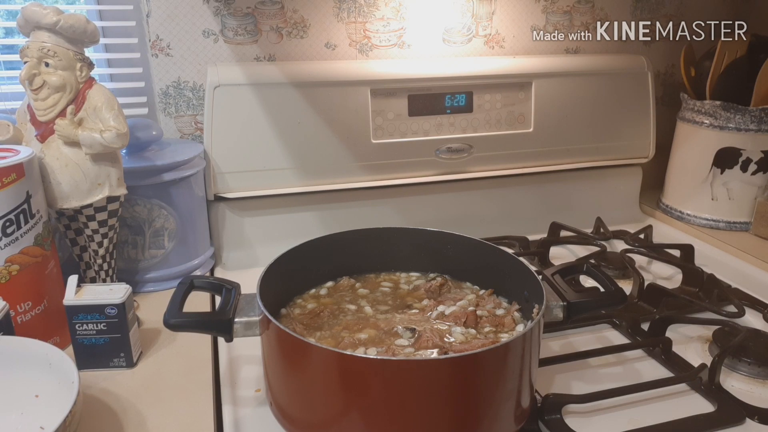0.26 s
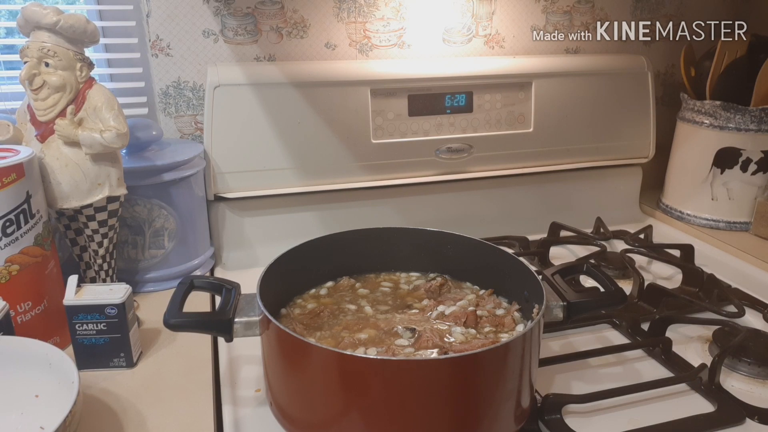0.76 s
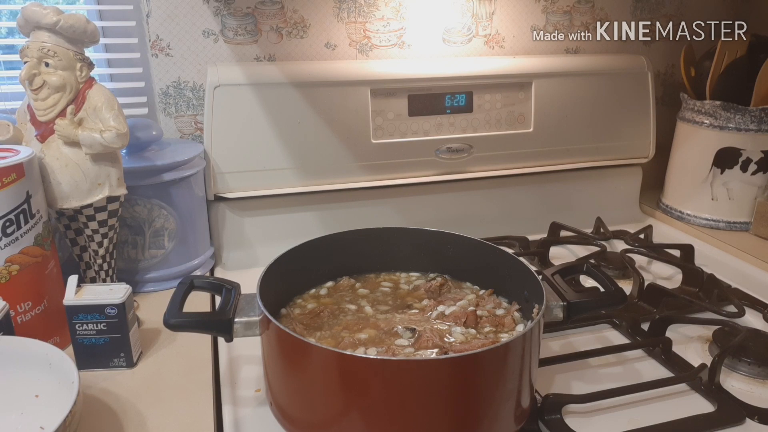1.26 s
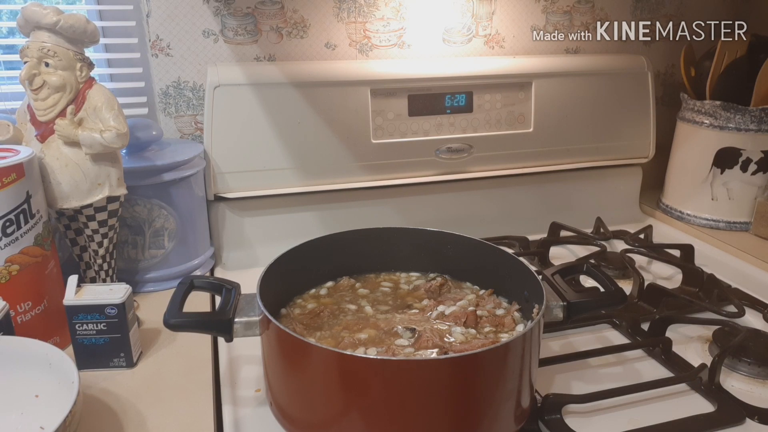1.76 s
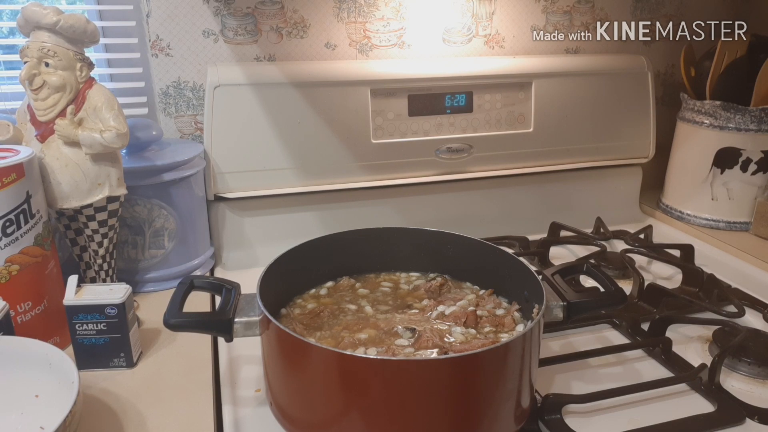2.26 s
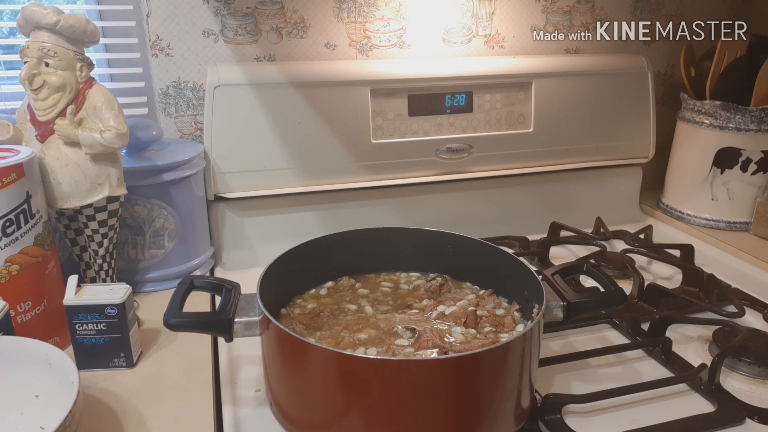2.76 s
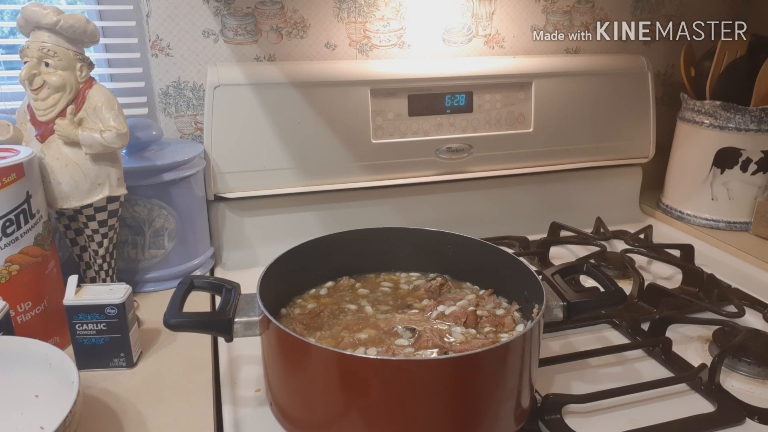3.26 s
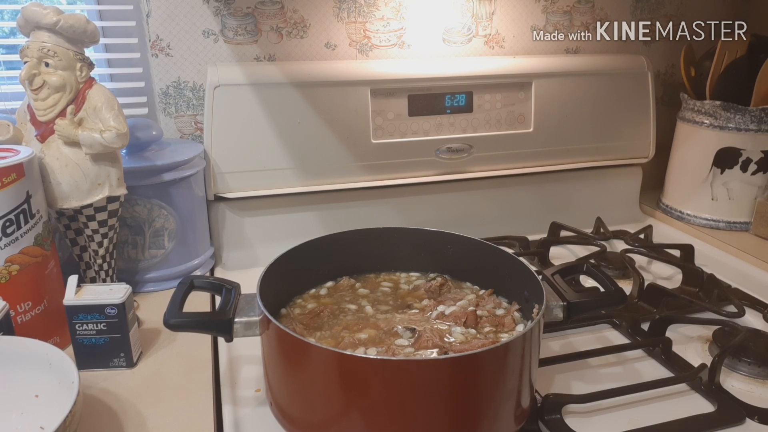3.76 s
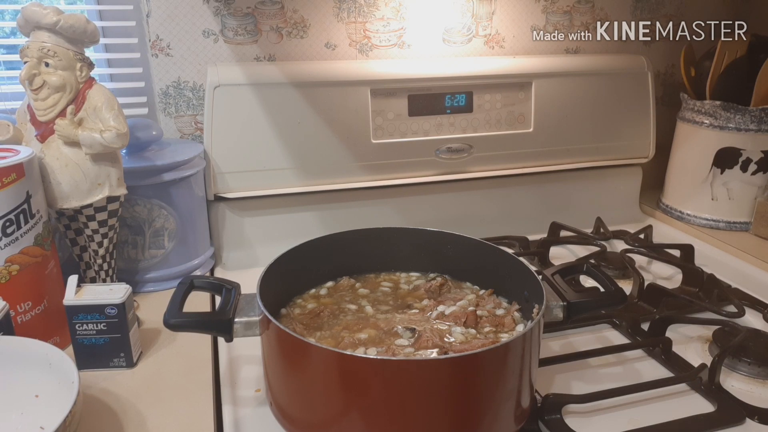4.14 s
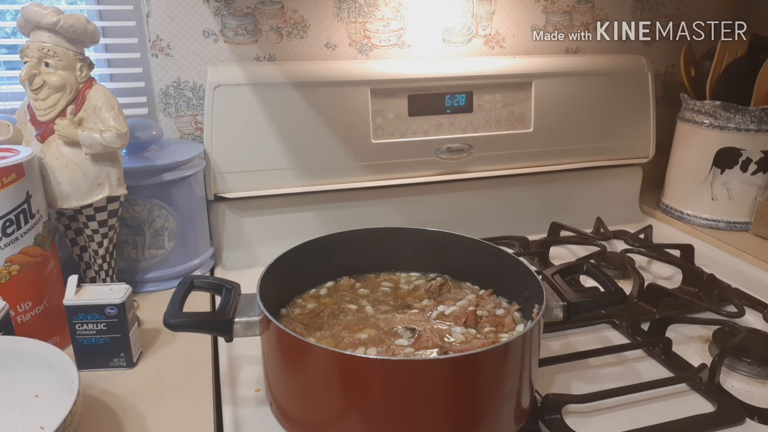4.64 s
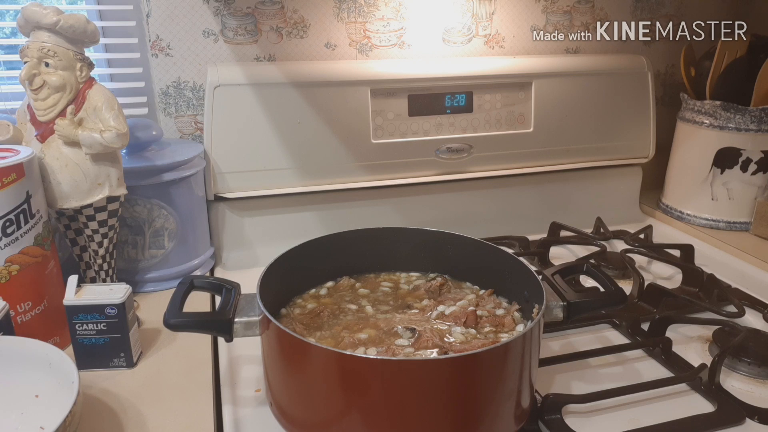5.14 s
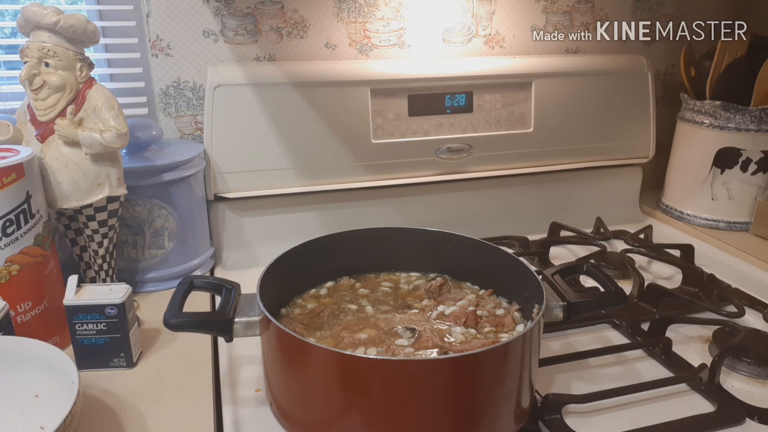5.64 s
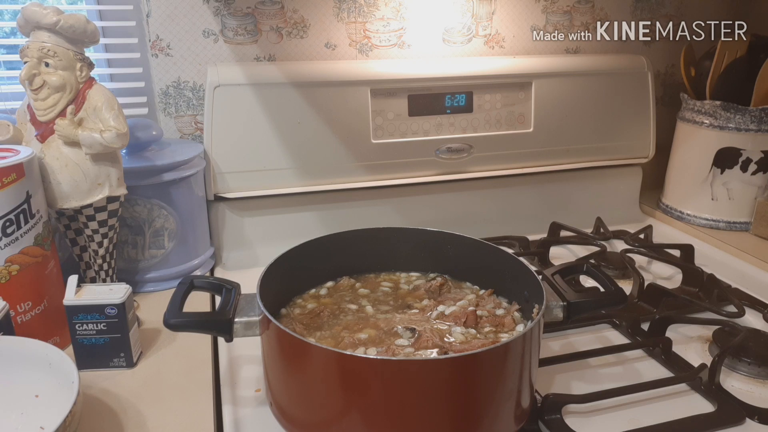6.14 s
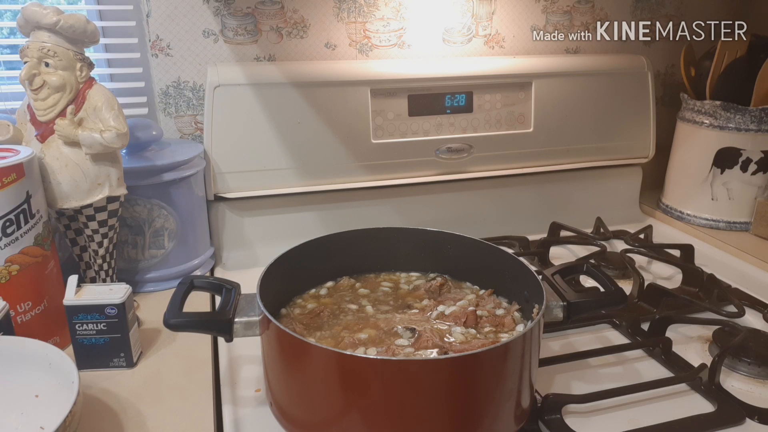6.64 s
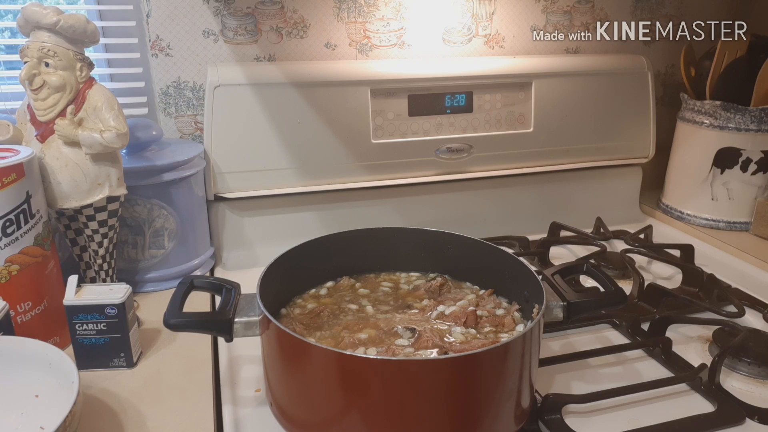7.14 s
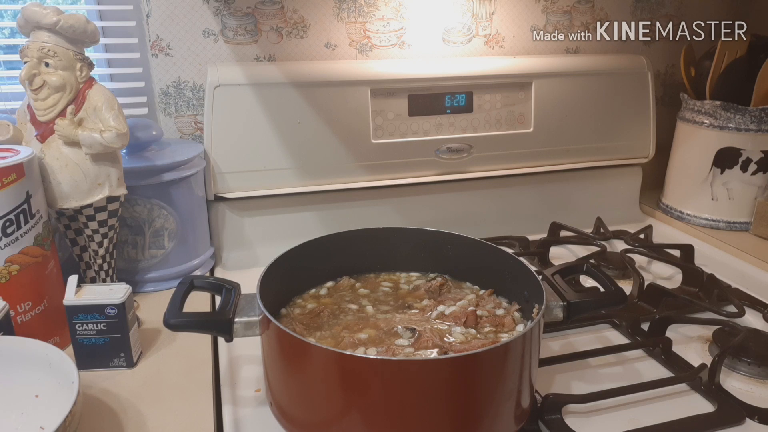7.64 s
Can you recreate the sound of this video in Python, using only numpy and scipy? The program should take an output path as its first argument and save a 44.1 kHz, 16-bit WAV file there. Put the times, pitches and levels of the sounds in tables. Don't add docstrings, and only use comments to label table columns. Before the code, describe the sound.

A stereo microphone near the stove picks up an even, airy gas hiss that dominates from start to finish. Over it, packaging rustles and rubs in quick strokes, and small metallic taps make a bowl ring briefly in three main clusters. Faint low scrapes and muffled knocks come from the counter. After a firm set-down near five and a half seconds the handling fades, leaving hiss, a faint scrape and fridge hum in a small room.

```python
import sys
import numpy as np
from scipy import signal
from scipy.fft import rfft, irfft, next_fast_len
from scipy.io import wavfile
from scipy.ndimage import uniform_filter1d, map_coordinates

SR = 44100
rng = np.random.default_rng(int(sys.argv[2]) if len(sys.argv) > 2 else 0)


def gain_from_decibels(decibels):
    exponent = np.asarray(decibels, float) / 20
    return 10 ** exponent


def generate_wav(signal):
    frames = np.transpose(np.atleast_2d(signal))
    scaled = np.clip(frames, -1, 1) * 32767
    pcm = np.round(scaled).astype(np.int16)
    wavfile.write(sys.argv[1], SR, pcm)


N = 347720

# time in seconds, hiss level in [dB].
FLAME_LEVEL = [(0.0, -42.5), (0.66, -39), (1.38, -40.5), (1.71, -39.5), (2.11, -40), (2.54, -39),
               (2.96, -39), (3.56, -39.5), (3.84, -41), (4.26, -39), (5.64, -40), (7.88, -39.5)]
# frequency in [Hz], level in [dB per Hz].
HISS_SPECTRUM = [(410, -36), (700, -18), (807, -16.5), (1070, -11), (2080, -7), (2470, -9), (3500, -3),
                 (4430, -2), (8150, -1.5), (8600, -8), (10200, -3.5), (12800, 1), (14000, 1), (15500, -4)]
# centre in [Hz], width in [Hz], strength in [dB].
BURNER_RESONANCES = [(495, 30, -8), (1554, 130, -1), (2048, 54, 6), (3570, 70, -23), (3740, 47, -1.5),
                     (4060, 35, -24), (4400, 6, 8.5), (11000, 2250, -4)]
# centre in [Hz], width in [Hz], share removed [0-1].
COUNTER_NULLS = [(3620, 120, .62), (3230, 70, .3), (2900, 70, .35), (1740, 60, .4)]

# start in [s], hold in [s], crinkle level in [dB], rub level in [dB].
HAND_MOVES = [(0.0, 0.48, -48.5, -65), (0.497, 0.26, -48.5, -52.5), (0.836, 0.22, -47, -76),
              (1.075, 0.42, -46.5, -57), (1.54, .03, -47, -62), (1.607, .68, -46.5, -54.5),
              (2.32, .23, -44, -55), (2.594, 0.21, -45, -54.5), (2.848, 0.12, -60, -50.5),
              (3.022, 0.27, -64, -59), (3.34, 0.26, -46, -53.5), (3.584, 0.26, -49.5, -53),
              (3.9, 0.077, -48, -55), (4.023, 0.022, -44, -47), (4.07, 0.11, -45.5, -60),
              (4.2, 0.11, -43, -60), (4.334, 0.23, -49, -61), (4.64, 0.045, -51, -57),
              (4.984, 0.1, -52, -66), (5.11, .03, -50, -50), (5.29, .1, -50, -53), (5.58, .05, -62, -47.5),
              (5.64, .13, -70, -60.5)]
# frequency in [Hz], level in [dB per Hz].
CRINKLE_SPECTRUM = [(1800, -120), (2200, -6.5), (3000, -4.5), (5000, 0), (7500, -1), (9000, -7.5),
                    (13000, 0.5), (15600, -41)]
# frequency in [Hz], level in [dB per Hz].
RUB_SPECTRUM = [(700, -120), (900, -6.5), (1500, 0), (2200, 3), (3200, -1), (4000, -120)]
# centre in [Hz], width in [Hz], strength in [dB].
CUPBOARD_RESONANCES = [(1085, 31, 11), (1310, 38, 5), (1518, 42, 13), (1680, 40, 5), (2030, 60, 3),
                       (2240, 64, 2)]

# time in [s], levels of the mode families near 1.9, 2.9 and 4.1 kHz in [dB],
# share of the ring time left by the hand's grip [0-1.5].
BOWL_TAPS = [(0.6404, -35, -47, -37, 0.55), (0.6509, -28.5, -43, -39, 1), (0.7172, -31, -36.5, -33, 0.53),
             (0.7664, -54, -50, -39.5, 1.2), (1.544, -43, -42, -52, 0.79), (1.5822, -46, -45, -41, 0.68),
             (4.027, -34.5, -39.5, -33.5, 1.05), (4.0499, -45, -53, -48, 0.76),
             (4.1258, -46, -62, -55, 0.9), (4.5264, -44, -35, -47, 0.55), (4.549, -46, -41, -51, 0.75),
             (4.681, -52, -44.5, -52, 0.98), (4.7101, -45.5, -55, -58, 1.1),
             (5.1061, -41.5, -46, -37.5, 0.97), (5.1294, -57, -44.5, -39, 0.98),
             (5.182, -39.5, -47, -47, 0.69), (5.2882, -73, -55, -58, 0.87), (5.32, -44, -40, -41, 1.4),
             (5.3677, -45.5, -58, -46, 1.1)]
# frequency in [Hz], t60 in [s], level within the family in [dB].
BOWL_MODES = [
    [(1923, 0.13, -25), (1864, 0.18, 2), (2054, 0.12, -13)],
    [(2776, 0.091, -7), (2875, 0.15, 1), (2950, 0.1, 3), (3040, 0.066, -3)],
    [(4132, 0.12, -3.5), (4170, 0.072, -0.5), (5520, 0.082, -7)],
    [(390, 0.081, -1), (996, 0.11, 3.5)],
]
# time in [s], level in [dB], frequency in [Hz], t60 in [s].
CUTLERY_PINGS = [(.5, -38, 1490, 0.056), (.72, -37, 2170, .07), (1.41, -44, 1280, 0.059),
                 (1.512, -35.5, 2240, 0.091), (1.547, -40, 3030, .06), (1.552, -38, 3170, .05),
                 (1.553, -49, 3280, .04), (1.575, -46, 825, .05), (1.905, -36, 2240, 0.064)]

# start in [s], hold in [s], level in [dB], counter tone in [Hz], tone share [0-1].
BOWL_PUSHES = [(1.268, 0.079, -60.5, 900, 0.3), (1.903, .2, -59, 830, .15), (2.15, 0.093, -57, 850, 0.3),
               (2.553, 0.26, -62.5, 855, .4), (2.88, 0.36, -55.5, 664, 0.24), (3.524, 0.13, -60, 665, .3),
               (3.72, 0.36, -58.5, 665, 0.18), (4.4, 0.13, -59, 743, 0.67), (5.983, 0.21, -56, 516, 0.32),
               (6.283, .02, -56.5, 516, 0.9)]
# frequency in [Hz], level in [dB per Hz].
SCRAPE_SPECTRUM = [(350, -120), (480, -11), (700, -12), (1100, -11.5), (1500, -120)]

# time in [s], low level in [dB], then middle, top and thump in [dB over low].
COUNTER_KNOCKS = [(0.65, -51, 11, 13, -18), (0.722, -46.5, 9, 15, -20), (1.516, -60, 13, 3, -14),
                  (1.544, -49, 11, 16, -3), (2.146, -42, -2, -17, -3.5), (4.029, -55, 9, 2, -15),
                  (4.523, -51, 3, 16, -15), (4.797, -57, -10, -12, -8), (5.549, -35.5, 7.5, 1.5, -28),
                  (6.439, -55.5, 3, -3, -11)]
# frequency in [Hz], level in [dB per Hz].
KNOCK_SPECTRA = [
    [(200, -29), (400, 3.5), (700, 1.5), (1000, -3.5), (1500, -47)],
    [(800, -39), (1150, -1.5), (2000, 2.5), (2700, -2.5), (4500, -17)],
    [(2000, -35), (2900, 0), (3600, -4.5), (4800, -6), (8000, -12)],
    [(40, -30), (80, 0), (220, -3), (400, -35)],
]

# frequency in [Hz], level in [dB per Hz].
RUMBLE_SPECTRUM = [(13, -52), (22, -55), (38, -11), (75, -8.5), (112, -10), (178, -8), (250, -9.5),
                   (450, -15.5), (511, -9.5), (563, -14), (1000, -23.5), (1300, -57), (2200, -120)]
# centre in [Hz], width in [Hz], strength in [dB].
FRIDGE_RESONANCES = [(122, 11, -2), (106, 5.2, 1), (55, 5.9, -14)]
# frequency in [Hz], left-right likeness [0-1].
STEREO_LIKENESS = [(60, 0.82), (130, .95), (290, 0.83), (640, 0.46), (1100, 0.19), (3700, 0.068),
                   (4400, 0.19), (5200, 0.02), (7300, 0.039), (9000, 0.034), (11800, 0.26), (15000, 0.069)]
# frequency in [Hz], t60 in [s].
ROOM_T60 = [(300, 0.36), (2000, 0.36), (6000, 0.16)]

LEAD_S = 20 / SR
MOVE_ATTACK_S, MOVE_RELEASE_S = 0.036, 0.066
SLIDE_ATTACK_S, SLIDE_RELEASE_S = 0.042, 0.18
BODY_DB = -20
KNOCK_T60_S = 0.31


def flame():
    def jets(hz):
        notches = [1 - share * peak(hz, centre, width) ** 2 for centre, width, share in COUNTER_NULLS]
        return resonant(HISS_SPECTRUM, BURNER_RESONANCES)(hz) * np.prod(notches, axis=0)

    flicker_db = 0.099 * wobble(3.77) + 0.23 * wobble(9)
    hiss = rush(jets, rng.standard_normal((2, N)), LEAD_S, ripple_db=1.7)
    return gain_from_decibels(flame_db() + 2.5 + flicker_db) * hiss


def rustle():
    effort = np.array([stroke(s, hold, MOVE_ATTACK_S, MOVE_RELEASE_S) for s, hold, *_ in HAND_MOVES])
    strength = gain_from_decibels(np.array(HAND_MOVES)[:, 2:].T)
    crinkle_gain, rub_gain = map(fine, np.sqrt(strength ** 2 @ effort ** 2))
    crinkle = gain_from_decibels(1.5 * wobble(45)) * rush(shape(CRINKLE_SPECTRUM), patches(2.14), LEAD_S)
    rub = gain_from_decibels(0.95 * wobble(25)) * rush(resonant(RUB_SPECTRUM, CUPBOARD_RESONANCES), patches(4.2))
    return crinkle_gain * gain_from_decibels(4.0) * unit(crinkle) + rub_gain * gain_from_decibels(1.64) * unit(rub)


def crockery():
    out = np.zeros((2, N + SR))
    for s, *levels, grip in BOWL_TAPS:
        levels = levels + [max(levels) + BODY_DB]
        tap = 0
        for level, family in zip(levels, BOWL_MODES):
            for hz, t60, db in family:
                detuned_hz = hz * rng.normal(1, 0.0022)
                mode_db = level + db + rng.normal(0, 1.34)
                tap = tap + ring(detuned_hz, mode_db, t60 * max(grip, .3))
        add(out, s, tap)
    for s, db, hz, t60 in CUTLERY_PINGS:
        add(out, s, ring(hz, db, max(t60, .01)))
    return out[:, :N]


def slides():
    out = np.zeros((2, N))
    broad = rush(shape(SCRAPE_SPECTRUM), patches(1.6), ripple_db=1.0)
    fuzz = np.array([wobble(50) + 1j * wobble(50), wobble(50) + 1j * wobble(50)])
    fuzz[1] = 0.71 * fuzz[0] + 0.59 * fuzz[1]
    fuzz = fuzz / np.sqrt(np.mean(abs(fuzz) ** 2) / 2)
    for s, hold, db, hz, share in BOWL_PUSHES:
        share = np.clip(share, 0, 1)
        gain = fine(stroke(s, hold, SLIDE_ATTACK_S, SLIDE_RELEASE_S))
        on = np.flatnonzero(gain > .01)
        tone = np.real(fuzz[:, on] * np.exp(2j * np.pi * hz * on / SR))
        friction = np.sqrt(share) * tone + np.sqrt(1 - share) * broad[:, on]
        out[:, on] += gain[on] * gain_from_decibels(db) * friction
    return out


def knocks():
    out = np.zeros((2, N + SR))
    t = np.arange(SR // 3) / SR
    fade = gain_from_decibels(-60 * t / KNOCK_T60_S) * (1 - np.exp(-t / 0.0025))
    for s, low, middle, top, thump in COUNTER_KNOCKS:
        start = round((s - .002) * SR)
        levels = (low, low + middle, low + top, low + thump)
        for db, spectrum in zip(levels, KNOCK_SPECTRA):
            noise = rush(shape(spectrum), rng.standard_normal((2, len(t))), ripple_db=1.0)
            out[:, start:start + len(t)] += gain_from_decibels(db - 3.5) * fade * noise
    return out[:, :N]


def rumble_and_fridge():
    hiss_db = flame_db()
    rumble_db = -58.0 + hiss_db - hiss_db.mean() + 1.8 * wobble(3.984)
    rumble = rush(resonant(RUMBLE_SPECTRUM, FRIDGE_RESONANCES), rng.standard_normal((2, N)), ripple_db=2.0)
    phase = 2 * np.pi * 120 * np.arange(N) / SR + 1.2 * wobble(6.5)
    mains = gain_from_decibels(-64.5 + 2.8 * wobble(6.6)) * np.sin(phase)
    return gain_from_decibels(rumble_db) * rumble + mains


def flame_db():
    s, db = np.transpose(FLAME_LEVEL)
    return np.interp(np.arange(N) / SR, s, db)


def ring(hz, db, t60):
    t = np.arange(SR // 4) / SR
    return gain_from_decibels(db - 60 * t / t60) * np.sin(2 * np.pi * hz * t) * (1 - np.exp(-t / 0.0029))


def add(out, s, sound):
    hz, t, z = signal.stft(rng.standard_normal((2, SR // 4)), SR, nperseg=256)
    decay = gain_from_decibels(-60 * t / along(ROOM_T60, hz)[:, None])
    tail = signal.istft(z * decay, SR, nperseg=256)[1]
    tail /= np.linalg.norm(tail[0])
    tail[:, 0] += 1
    heard = signal.fftconvolve(sound[None], tail, axes=1)
    heard /= np.linalg.norm(heard, axis=1, keepdims=True)
    heard *= 1.28 * np.linalg.norm(sound) / np.linalg.norm(heard.mean(0))
    start = round(s * SR)
    out[:, start:start + heard.shape[1]] += heard


def stroke(start, hold, attack, release):
    t = np.arange(0, N / SR + .01, .001)
    rise = (t - start) / max(attack, .005)
    fall = (start + hold - t) / max(release, .005)
    return gain_from_decibels(20 * np.minimum(0, np.minimum(rise, fall)))


def fine(gain):
    return np.interp(np.arange(N) / SR, np.arange(len(gain)) / 1000, gain)


def rush(gain, pair, lead_s=0, ripple_db=0):
    size = next_fast_len(pair.shape[1])
    hz = np.fft.rfftfreq(size, 1 / SR)
    ripple = gain_from_decibels(ripple_db * np.interp(hz / 26, np.arange(1000), rng.standard_normal(1000)))
    turn = np.arccos(np.clip(along(STEREO_LIKENESS, hz), -1, 1)) / 2
    mid, side = rfft(pair, size) * gain(hz) * ripple * [np.cos(turn), np.sin(turn)]
    lead = np.exp(1j * np.pi * hz * lead_s)
    stereo = irfft([(mid + side) * lead, (mid - side) / lead], size)
    return unit(stereo[:, :pair.shape[1]])


def patches(depth_db):
    z = signal.stft(rng.standard_normal((2, N)), nperseg=512)[2]
    field = uniform_filter1d(rng.standard_normal(z.shape[1:]), 6, 0)
    field = uniform_filter1d(field, 14, 1)
    return signal.istft(z * gain_from_decibels(depth_db * unit(field)), nperseg=512)[1][:, :N]


def resonant(spectrum, modes):
    return lambda hz: shape(spectrum)(hz) * (1 + sum(gain_from_decibels(db) * peak(hz, c, w) ** 2 for c, w, db in modes))


def shape(spectrum):
    return lambda hz: gain_from_decibels(along(spectrum, hz))


def peak(hz, centre, width):
    return 1 / np.sqrt(1 + (2 * (hz - centre) / width) ** 2)


def along(points, hz):
    f, v = np.transpose(points)
    return np.interp(np.log(hz + 1), np.log(f + 1), v)


def wobble(rate):
    knots = rng.standard_normal(int(N * rate / SR) + 4)
    return map_coordinates(knots, [np.arange(N) * rate / SR])


def unit(x):
    return x / np.sqrt(np.mean(x ** 2) + 1e-20)


def scene():
    bowl = crockery() * gain_from_decibels([[-.8], [.8]])
    return flame() + rustle() + bowl + slides() + knocks() + rumble_and_fridge()


def roll_off(x):
    return signal.sosfilt(signal.butter(12, 15510, fs=SR, output="sos"), x)


def record(dry):
    mix = dry * gain_from_decibels([[.45], [-.45]])
    return roll_off(mix)


dry = scene()
out = record(dry)
generate_wav(out)
```